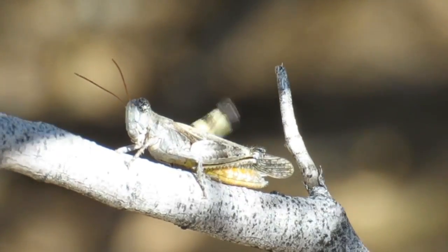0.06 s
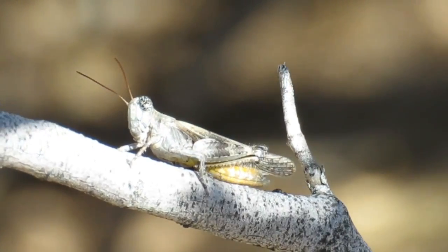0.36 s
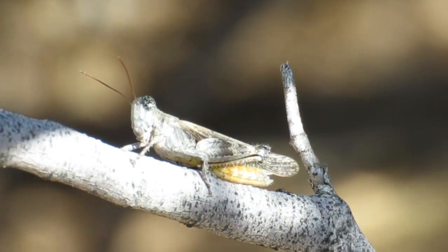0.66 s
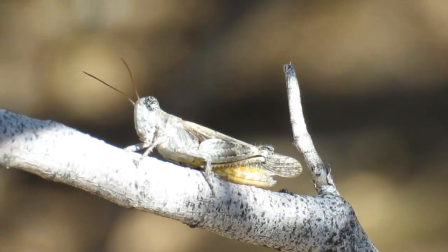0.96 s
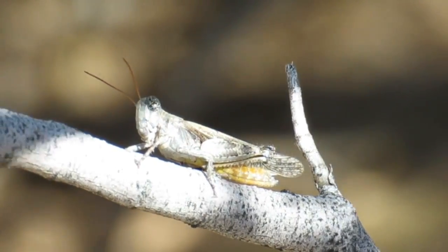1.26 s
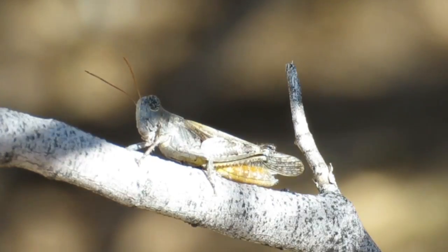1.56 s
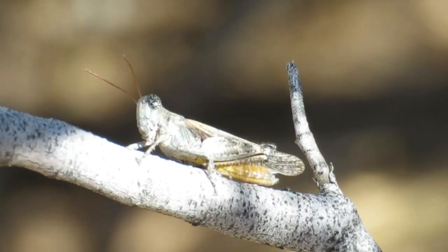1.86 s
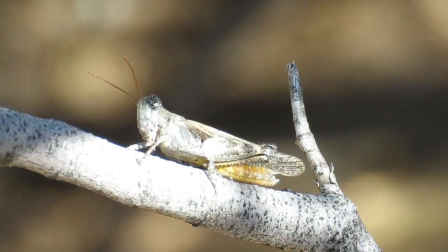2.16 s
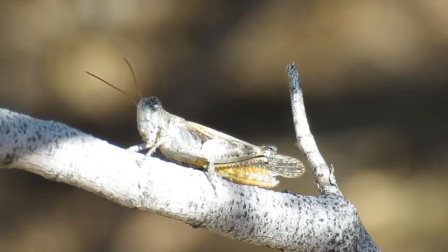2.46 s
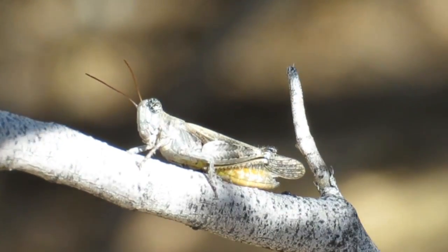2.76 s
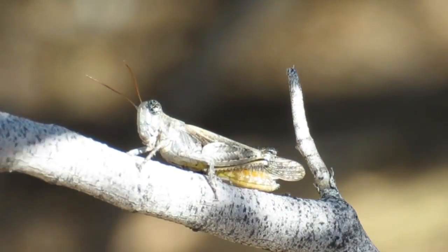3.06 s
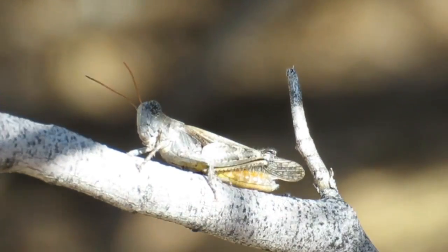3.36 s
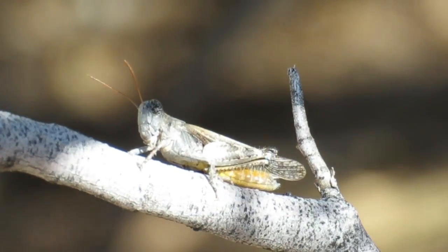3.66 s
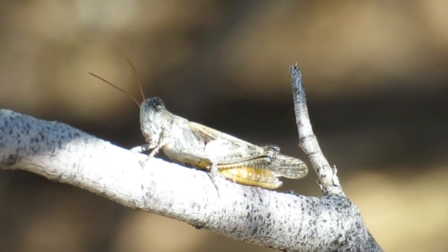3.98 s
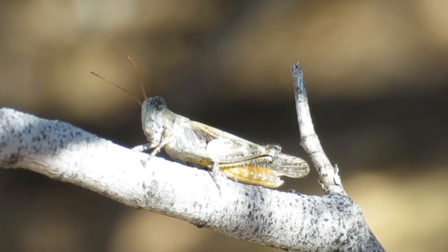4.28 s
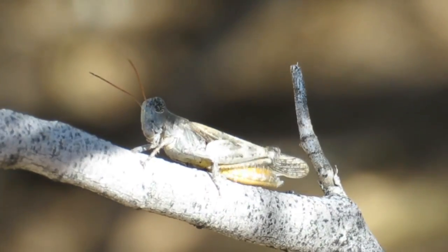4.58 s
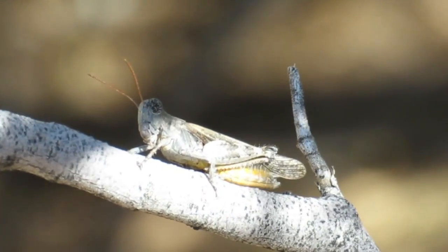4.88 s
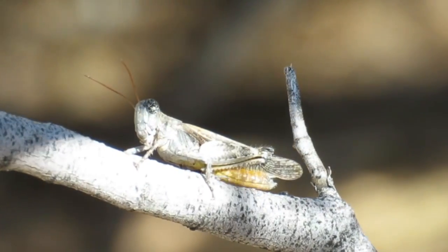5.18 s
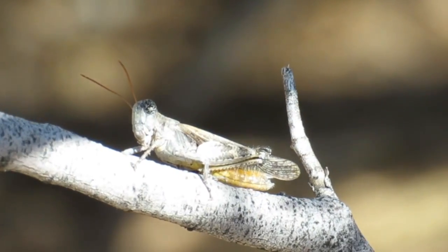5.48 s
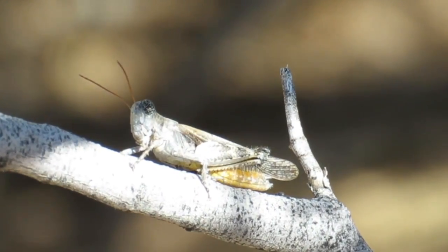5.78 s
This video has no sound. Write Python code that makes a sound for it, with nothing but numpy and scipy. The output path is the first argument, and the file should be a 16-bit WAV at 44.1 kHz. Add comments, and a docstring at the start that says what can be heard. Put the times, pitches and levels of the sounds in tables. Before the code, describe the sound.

A grasshopper stridulates close to the microphone outdoors, each stroke a very short, high, dry rasping click. Three quick strokes come at about 0.2 to 0.4 seconds, the first one softer. Two follow at 1.8 to 1.9 seconds, three at 3.2 to 3.4, again starting softly, and three more at 4.6 to 4.8. These are by far the loudest sounds. Soft, steady wind with a faint low drone continues throughout. A distant bird gives thin, faint chirps now and then, from about 0.5 seconds to the end. Fainter insect rasps sound farther off around 1.3 seconds and just before the third group. Dry grass ticks and rustles lightly, mostly between 2 and 2.4 seconds. From about 4.9 seconds, a far engine adds a quiet, low, wavering hum that climbs in pitch and swells until the end, near 6 seconds.

```python
"""Rasping clicks, close, in four groups of two or three: a grasshopper stridulates on a dead branch.
In each leg stroke a row of pegs catches the wing vein four or five times, drags to a stop and
brushes it on the way back; every peg snap rings the wing.
Around it: steady wind over a faint drone, fainter rasps, a far bird's thin chirps, rustling dry grass,
and near the end a far engine gathering speed."""
import sys
import numpy as np
from scipy import signal
from scipy.fft import rfft, irfft, next_fast_len
from scipy.io import wavfile

SR = 44100
rng = np.random.default_rng(int(sys.argv[2]) if len(sys.argv) > 2 else 0)


def store_pcm(level_fs):
    """Save levels as 16-bit WAV."""
    pcm = np.round(np.clip(level_fs, -1, 1) * 32767).astype(np.int16)
    wavfile.write(sys.argv[1], SR, np.atleast_2d(pcm).T)


N = 257103
TIME_S = np.arange(N) / SR

# leg strokes: first grab t/s, level/dB, pull/s, grab count, touch lead/s, touch/dB, drag/dB, drag/s,
# return/dB, return/s; touch, drag and return levels are relative to the stroke
LEG_STROKES = [(0.1639, -24.5, 0.0078, 3, 0.0057, -6.5, -4.5, 0.01, -25, 0.018),
               (0.2565, -13.5, 0.013, 4, 0.0064, -11, -14.5, .011, -33, 0.016),
               (0.3302, -14, 0.014, 4, 0.0051, -15.5, -9.5, .011, -29, 0.023),
               (1.8113, -15, 0.0067, 3, 0.004, -5.5, -4.5, 0.01, -40, 0.014),
               (1.8791, -14, 0.013, 4, 0.0056, -14.5, -8, .012, -28, 0.017),
               (3.2357, -24, 0.0087, 3, 0.0045, -10.5, -5.5, 0.012, -22.5, 0.034),
               (3.3016, -13.5, 0.016, 4, 0.004, -9.5, -14, 0.014, -29, 0.027),
               (3.3804, -14, 0.0134, 4, 0.006, -9, -8.5, .011, -33, 0.036),
               (4.5724, -14.5, 0.0086, 3, .0049, -9.5, -7, .0075, -33, 0.033),
               (4.6383, -13, 0.0102, 3, 0.004, -5, -9.5, 0.011, -31.5, 0.04),
               (4.7168, -13, 0.016, 4, 0.0053, -16, -18, .011, -25, 0.039)]
# squeaks of the returning leg: t/s, level/dB, length/s, first f/Hz, last f/Hz
LEG_SQUEAKS = [(1.836, -55, .013, 3150, 3950), (1.91, -50, .014, 4300, 3800),
               (3.409, -49, 0.02, 4720, 4140), (4.669, -54, .014, 3250, 4100),
               (4.749, -52, 0.015, 4230, 2900), (4.771, -60, 0.026, 3050, 4050)]
# rasps farther off: t/s, level/dB, nominal length/s, peg rate/Hz
FAR_RASPS = [(1.235, -56, 0.046, 7000), (1.322, -50, 0.033, 9500), (1.403, -48.5, 0.031, 9540),
             (3.166, -54.5, 0.031, 7900)]
# bird chirps: t/s, level/dB, length/s, top f/Hz, twitter level/dB
BIRD_CHIRPS = [(0.546, -53.5, 0.045, 3310, -70), (0.695, -55, 0.055, 3060, -58.5),
               (1.256, -58, 0.047, 3720, -70), (1.608, -65, .04, 3320, -59), (2.16, -63, 0.059, 4130, -61),
               (2.215, -53, 0.048, 3120, -65), (3.64, -58.5, 0.04, 3080, -70),
               (3.698, -62, 0.072, 2860, -63), (4.053, -66, 0.046, 4000, -65),
               (4.106, -61, 0.056, 3170, -68), (4.262, -67, 0.038, 3200, -72),
               (4.798, -52.5, .034, 2790, -76), (5.798, -62, .034, 3470, -62)]
# sharp ticks of grass: t/s, level/dB
TICKS = [(0.303, -45), (1.556, -53), (1.651, -52), (2.062, -42), (2.077, -49), (2.127, -47.5),
         (2.1865, -49), (2.2294, -52), (2.401, -50), (3.9816, -48), (4.449, -53)]
# stirs of grass: centre t/s, level/dB, half-width/s
GRASS_STIRS = [(0.03, -62.5, .09), (1.56, -63, .015), (1.651, -54, .012), (2.07, -56, 0.091),
               (2.195, -56, 0.016), (4.02, -62, .035)]
# distant drone: f/Hz, width/Hz, level/dB
DRONE_BANDS = [(243.9, 10.3, -53), (364.3, 12, -60), (488, 12, -64.5)]

# spectral shapes: f/Hz, relative level/dB
WING_EQ = [(1000, -41.5), (2000, -19.5), (3000, -14), (4200, -6.5), (6000, -1.5), (7500, 1), (8700, -0.5),
           (10500, -2.5), (12000, -5), (13500, -8), (15200, -9.5), (17000, -23)]  # wing's response to one peg
BRUSH_EQ = [(1000, -41), (2500, -12), (4200, -7.5), (6500, -7), (8500, 0), (9700, 0.5), (11000, -10.5),
            (13000, -12), (16000, -14)]  # lightly brushed wing
FAR_RASP_EQ = [(1500, -45), (3200, -15), (5000, -4), (7000, -2), (9800, 3.5), (11500, -6), (16000, -12)]
TWITTER_EQ = [(1800, -32), (2700, 1), (3200, -3), (4100, -5), (4800, -12.5), (6500, -28)]
GRASS_EQ = [(1000, -17), (2500, 4), (4000, 1), (7000, -1), (10000, -3.5), (16000, -12)]
WIND_EQ = [(20, -12.5), (50, -10.5), (85, -3), (125, -1.5), (225, -2.5), (300, -6.5), (500, -8), (700, -12),
           (1000, -12.5), (1400, -19), (2000, -27), (3000, -33.5), (5000, -37), (15500, -39)]  # far trees over an even hiss


def grasshopper(slowing=0.064, speed_spread=0.044, firm_db=-14, speed_per_db=-0.01):
    """Each stroke: short fast peg runs, a longer slowing drag, then the leg's light return."""
    out = np.zeros(N)
    for start_s, db, pull_s, grabs, lead_s, touch_db, drag_db, drag_s, back_db, back_s in LEG_STROKES:
        for delay_s, grab_db, length_s, peg_hz in leg_pull(pull_s, grabs, lead_s, touch_db):
            hz = peg_hz * (1 + speed_per_db * (db - firm_db) + speed_spread * rng.standard_normal())
            first_hz, last_hz = hz * (1 + slowing), hz * (1 - slowing)
            grab = peg_run(length_s, first_hz, last_hz, snatch, wing_eq(db + grab_db), uneven=0.17)
            add(out, start_s + delay_s - length_s / 2, from_db(db + grab_db) * grab)
        last_grab_s = start_s + pull_s
        drag = peg_run(drag_s, first_hz=5200, last_hz=2600, pressure=easing,
                       eq=wing_eq(db + drag_db), uneven=0.2)
        add(out, last_grab_s + 0.001117, from_db(db + drag_db) * drag)
        turn_s = last_grab_s + 0.012
        brush = peg_run(back_s, first_hz=3600, last_hz=3600, pressure=easing, eq=BRUSH_EQ, uneven=0.26)
        add(out, turn_s, from_db(db + back_db - 2.5) * brush)
        # second half of the return: fastest, lightest
        add(out, turn_s + back_s / 2, from_db(db + back_db - 12) * zing(back_s / 2))
    return out


def leg_pull(pull_s, grabs, lead_s, touch_db, first_hz=7030, full_hz=8750,
             first_grab_s=0.0018, last_grab_s=0.0039, touch_pegs=10.5, touch_db_per_octave=8.5,
             hurry=0.11, usual_wait_s=0.0048, stick_db_per_doubling=3.5, firmest_at=0.42):
    """A touch, then grabs that crowd, speed up and lengthen: delay/s, level/dB, length/s, peg rate/Hz."""
    touch_hz = full_hz * 2 ** (touch_db / touch_db_per_octave)
    u = np.linspace(0, 1, grabs)
    delay_s = pull_s * (u + hurry * u * (1 - u))
    wait_s = np.maximum(np.diff(delay_s, prepend=-lead_s), first_grab_s)
    release_db = stick_db_per_doubling * np.log2(wait_s / usual_wait_s)  # longer stick, harder release
    pressure_db = -6 * (u - firmest_at) ** 2
    length_s = first_grab_s + (last_grab_s - first_grab_s) * u ** 1.9
    peg_hz = full_hz + (first_hz - full_hz) * (1 - u) ** 3
    touch = (-lead_s, touch_db, touch_pegs / touch_hz, touch_hz)
    return [touch, *zip(delay_s, release_db + pressure_db, length_s, peg_hz)]


def peg_run(length_s, first_hz, last_hz, pressure, eq, uneven, size=2048, pegs=450):
    """Pegs snap over the vein one by one, each ringing the wing. Unit power, 42 ms at most."""
    spacing, height = rng.standard_normal(pegs), rng.uniform(-1, 1, pegs)
    length_s = np.clip(length_s, 0.001, 0.042)
    rate_hz = np.interp(np.arange(pegs), [0, length_s * (first_hz + last_hz) / 2], [first_hz, last_hz])
    snap_s = np.cumsum(1 / rate_hz) + uneven * spacing / rate_hz
    inside = (snap_s > 0) & (snap_s < length_s)
    force = pressure(snap_s[inside] / length_s) * (1 + 0.86 * uneven * height[inside])
    bins_hz = np.fft.rfftfreq(size, 1 / SR)
    snap_spectrum = np.exp(-2j * np.pi * np.outer(bins_hz, snap_s[inside])) @ force
    sound = irfft(snap_spectrum * response(eq, size))
    return sound * np.sqrt(length_s * SR / (np.sum(sound ** 2) + 1e-20))


def wing_eq(db, loud_db=-18, thinning=0.46, corner_hz=3200):
    """A lightly pressed wing gives less of its lowest ring."""
    lost_db = thinning * max(loud_db - db, 0)
    return [(hz, level_db - lost_db / (1 + (hz / corner_hz) ** 6)) for hz, level_db in WING_EQ]


def arch(u):
    """Swell and fade over u = 0..1."""
    return np.sin(np.pi * np.clip(u, 0, 1))


def snatch(u):
    """Grab pressure: an arch that peaks early."""
    return arch(u ** 0.88) ** 1.03


def easing(u):
    """Pressure that builds at once and is slowly let go."""
    return (1 - np.exp(-u / 0.042)) * (1 - u ** 2.4)


def zing(length_s, peg_hz=9650, uneven=0.1, wander=0.028):
    """Lightly touched pegs run evenly: almost a tone."""
    first_hz, last_hz = peg_hz * (1 + wander * rng.standard_normal(2))
    return peg_run(length_s, first_hz, last_hz, arch, BRUSH_EQ, uneven)


def leg_squeaks(trim_db=1):
    """The returning leg sometimes squeaks in a brief, rough glide."""
    out = np.zeros(N)
    for start_s, db, length_s, first_hz, last_hz in LEG_SQUEAKS:
        hz = np.linspace(first_hz, last_hz, round(length_s * SR))
        add(out, start_s, from_db(db + trim_db) * glide(hz, waver=0.04))
    return out


def dry_grass(tick_decay_s=0.0026, tick_trim_db=1, grains_per_s=2500, clump_db=3, stir_trim_db=2.5):
    """Stirring grass: single ticks and a crackle of tiny grains."""
    tick_gain = np.zeros(N)
    for start_s, db in TICKS:
        add(tick_gain, start_s, from_db(db + tick_trim_db) * np.exp(-TIME_S[:SR // 20] / tick_decay_s))
    ticks = tick_gain * shaped_noise(GRASS_EQ)
    grains = (rng.random(N) < grains_per_s / SR) * rng.standard_normal(N)
    grains *= from_db(clump_db * drift(rate_hz=50))
    stir = sum(from_db(db + stir_trim_db) * swell(t_s, half_s) for t_s, db, half_s in GRASS_STIRS)
    return ticks + stir * rms_one(colour(grains, GRASS_EQ))


def far_rasps(grabs=6.1, depth=0.49):
    """Leg strokes from afar, their grabs half merged."""
    def pressure(u):
        return arch(u) * (1 + depth * np.cos(2 * np.pi * grabs * u))

    out = np.zeros(N)
    for start_s, db, length_s, peg_hz in FAR_RASPS:
        rasp = peg_run(length_s, peg_hz, peg_hz, pressure, FAR_RASP_EQ, uneven=0.3)
        add(out, start_s, from_db(db) * rasp)
        add(out, start_s + length_s / 4, from_db(db) * zing(length_s / 2, peg_hz, uneven=0.17))
    return out


def far_bird(rise=0.17, top_at=0.684, chirp_trim_db=-0.5, twitter_trim_db=-4.5, flutter_db=3):
    """Chirps that climb and level off, each in a blur of farther twitter."""
    chirps, twitter_gain = np.zeros(N), np.zeros(N)
    for start_s, db, length_s, top_hz, twitter_db in BIRD_CHIRPS:
        u = np.linspace(0, 1, round(length_s * SR))
        hz = top_hz * (1 - rise * (1 - u / top_at) ** 2)
        add(chirps, start_s, from_db(db + chirp_trim_db) * glide(hz, waver=0.027))
        twitter_gain += from_db(twitter_db) * swell(start_s + length_s / 4, half_width_s=0.074)
    twitter = twitter_gain * shaped_noise(TWITTER_EQ)
    return chirps + twitter * from_db(twitter_trim_db + flutter_db * drift(rate_hz=26))


def wind(level_db=-41.5, gust_db=0.5):
    """Wind in far trees: a soft rush that barely swells."""
    rush = shaped_noise(WIND_EQ)
    return from_db(level_db + gust_db * drift(rate_hz=0.79)) * rush


def far_engine(entry_s=4.92, fade_s=0.196, entry_hz=117.8, climb_hz_per_s=21, waver=0.017, octave_db=-17,
               entry_db=-48.5, swell_db_per_s=6, level_waver_hz=5.37, level_waver_db=5, crest_s=5.452):
    """A low hum at the firing rate; climbs and swells, its loudness wavering about five times a second."""
    since_s = TIME_S - entry_s
    firing_hz = (entry_hz + climb_hz_per_s * since_s) * (1 + waver * drift(rate_hz=12.6))
    phase = 2 * np.pi * np.cumsum(firing_hz) / SR
    hum = np.sqrt(2) * (np.sin(phase) + from_db(octave_db) * np.sin(2 * phase))
    level_waver = np.cos(2 * np.pi * level_waver_hz * (TIME_S - crest_s))
    fade = np.clip(1 + since_s / fade_s, 0, 1) ** 2  # complete at entry_s
    return fade * from_db(entry_db + swell_db_per_s * since_s + level_waver_db * level_waver) * hum


def far_drone():
    """A wavering engine drone under the wind: three narrow noise bands."""
    out = np.zeros(N)
    for hz, width_hz, db in DRONE_BANDS:
        phase = 2 * np.pi * hz * TIME_S
        out += from_db(db) * (drift(width_hz / 2) * np.cos(phase) + drift(width_hz / 2) * np.sin(phase))
    return out


def tree_scatter(x, level_db, t60_s):
    """Diffuse, decaying reflections off the trees."""
    t_s = TIME_S[:SR // 2]
    tail = rng.standard_normal(len(t_s)) * np.exp(-np.log(1000) * t_s / t60_s)
    return from_db(level_db) * signal.fftconvolve(x, tail / np.linalg.norm(tail))[:N]


def glide(hz, waver, knots=20):
    """Wavering, arched tone along a pitch curve; unit power."""
    u = np.linspace(0, 1, len(hz))
    wobble = np.interp(u, np.linspace(0, 1, knots), rng.standard_normal(knots))
    phase = 2 * np.pi * np.cumsum(hz * (1 + waver * wobble)) / SR
    return 2 * arch(u) * np.sin(phase)


def swell(centre_s, half_width_s):
    """Bell-shaped gain."""
    return np.exp(-np.minimum(((TIME_S - centre_s) / half_width_s) ** 2, 50))


def drift(rate_hz, hop=40):
    """Slow random curve, unit RMS."""
    hz = np.fft.rfftfreq(N // hop, hop / SR)
    slow = irfft(rfft(rng.standard_normal(N // hop)) / (1 + (hz / rate_hz) ** 2))
    return np.interp(np.linspace(0, len(slow) - 1, N), np.arange(len(slow)), rms_one(slow))


def shaped_noise(eq):
    """Unit-power noise with a spectral shape."""
    return rms_one(colour(rng.standard_normal(N), eq))


def colour(x, eq):
    """Filter by a spectral shape."""
    size = 2 * next_fast_len(len(x) // 2 + 1)
    return irfft(rfft(x, size) * response(eq, size), size)[:len(x)]


def response(eq, size):
    """Minimum-phase response through (f/Hz, level/dB) points."""
    hz, db = np.transpose(eq)
    bins_hz = np.maximum(np.fft.rfftfreq(size, 1 / SR), 1)
    gain = from_db(np.interp(np.log(bins_hz), np.log(hz), db))
    cepstrum = irfft(np.log(gain), size)
    cepstrum[1:size // 2] *= 2
    cepstrum[size // 2 + 1:] = 0
    return np.exp(rfft(cepstrum))


def add(out, start_s, sound):
    """Mix in at start_s."""
    i = max(round(start_s * SR), 0)
    out[i:i + len(sound)] += sound[:max(N - i, 0)]


def from_db(db):
    """dB to gain."""
    return 10 ** (np.asarray(db) / 20)


def rms_one(x):
    """Scale to unit power."""
    return x / np.sqrt(np.mean(x ** 2) + 1e-20)


def scene():
    """Near sounds almost dry, far rasps and bird with more scatter; identical channels."""
    near = grasshopper() + leg_squeaks() + dry_grass()
    far = far_rasps() + far_bird()
    early = tree_scatter(near, level_db=-16.5, t60_s=0.039)
    late = tree_scatter(near, level_db=-32.5, t60_s=0.22)
    far += tree_scatter(far, level_db=-9.5, t60_s=0.13)
    mono = near + early + late + far + wind() + far_engine() + far_drone()
    return np.array([mono, mono])


def record(dry):
    """Steep low-pass."""
    cutoff_hz = 15750
    return signal.sosfilt(signal.ellip(12, 0.1, 80, cutoff_hz, fs=SR, output="sos"), dry)


dry = scene()
out = record(dry)
store_pcm(out)
```